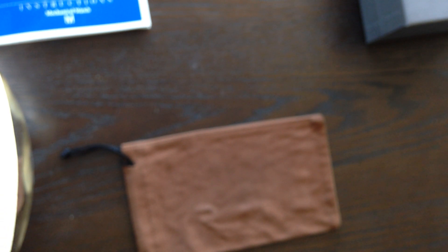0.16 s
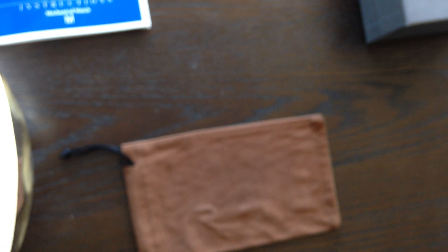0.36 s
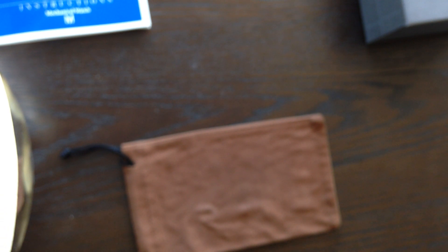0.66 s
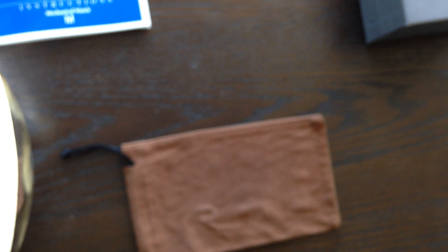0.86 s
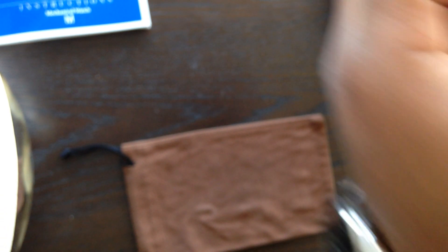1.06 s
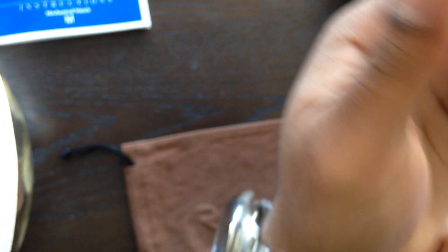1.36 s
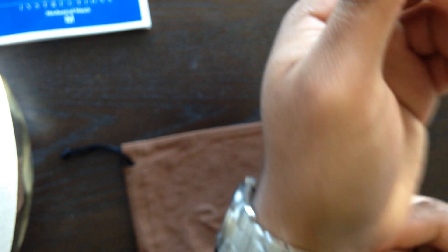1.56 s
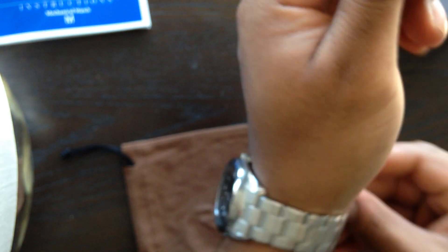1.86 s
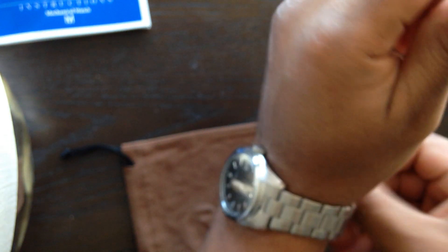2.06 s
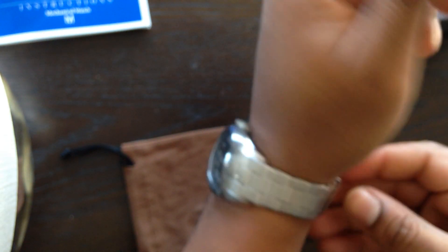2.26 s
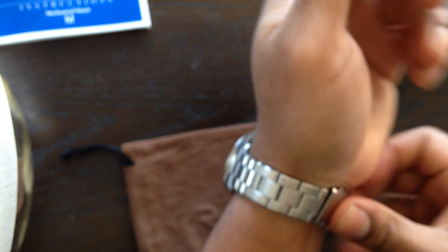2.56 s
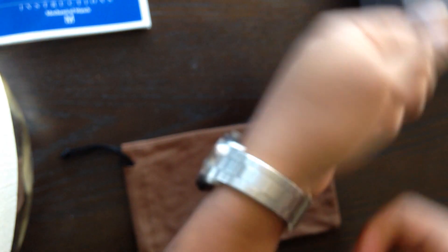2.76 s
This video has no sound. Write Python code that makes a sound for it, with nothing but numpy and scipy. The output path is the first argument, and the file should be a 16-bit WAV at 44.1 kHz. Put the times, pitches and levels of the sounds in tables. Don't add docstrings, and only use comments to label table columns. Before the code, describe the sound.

A metal watch bracelet clinks softly over a hand, then its clasp clicks and snaps shut.

```python
import sys
import numpy as np
from scipy import signal
from scipy.io import wavfile

SR = 44100
rng = np.random.default_rng(int(sys.argv[2]) if len(sys.argv) > 2 else 0)


def to_linear_factor(level_db):
    exponent = np.asarray(level_db, float) / 20
    return 10 ** exponent


def generate_wav(signal):
    frames = np.transpose(np.atleast_2d(signal))
    scaled = np.clip(frames, -1, 1) * 32767
    pcm = np.round(scaled).astype(np.int16)
    wavfile.write(sys.argv[1], SR, pcm)


N = 127890

# t/s, level/dB
SNAP = [
    (2.5963, -34),
    (2.5968, -19.5),
    (2.5972, -17),
    (2.5975, -17.5),
    (2.5981, -21),
    (2.5992, -27),
    (2.6007, -31),
]


def rms_one(x):
    return x / np.sqrt(np.mean(x ** 2) + 1e-20)


def in_time(rows):
    return np.interp(np.arange(N) / SR, *np.transpose(rows))


def at_hz(points, hz):
    freqs, values = np.array(points).T
    return np.interp(np.log(hz), np.log(freqs), values)


def drift(rate):
    step, settle = 40, 2000
    r = np.exp(-2 * np.pi * rate * step / SR)
    noise = rng.standard_normal(N // step + settle + 2)
    slow = signal.lfilter([1], [1, -2 * r, r * r], noise)[settle:]
    return np.interp(np.arange(N) / step, np.arange(len(slow)), rms_one(slow))


def ring(clicks, hz, t60):
    r = to_linear_factor(-60 / (t60 * SR))
    w = 2 * np.pi * hz / SR
    return signal.lfilter([0, np.sin(w)], [1, -2 * r * np.cos(w), r * r], clicks + 1e-18)


def whistle(hz, width, count):
    return rms_one(ring(rng.standard_normal(count), hz, 1.9 / width))


def highpass(x, order, hz):
    return signal.sosfilt(signal.butter(order, hz, "high", fs=SR, output="sos"), x)


def bands():
    edges = 20 * 2 ** np.arange(0, 9.9, 1 / 3)
    return [(np.sqrt(a * b), signal.butter(2, [a, b], "band", fs=SR, output="sos"))
            for a, b in zip(edges, edges[1:])]


def coloured(spectrum, patchy_db, source):
    low, high = spectrum[0][0] / 1.3, spectrum[-1][0] * 1.3
    total = np.zeros(N)
    for k, (hz, sos) in enumerate(bands()):
        if low < hz < high:
            gain = to_linear_factor(at_hz(spectrum, hz) + patchy_db * drift(26))
            total += gain * signal.sosfilt(sos, source[k % 2])
    return rms_one(total)


def add(out, s, burst):
    i = int(s * SR)
    out[i:i + len(burst)] += burst[:N - i]


def background():
    # f/Hz, level/dB per Hz
    floor_spectrum = [(12, -51), (20, -25), (101, 0.5), (222, -21), (388, -15.5), (738, -20.5),
                      (897, -27.5), (4940, -28.5), (16000, -41.5)]
    # f/Hz, width/Hz, level/dB rms, share of the load swing
    hum_lines = [(56.6, 14, -76.5, 0.71), (105.4, 29, -72, 0.037), (139, 53, -86, 0.12),
                 (217, 25, -83.5, 1), (295.6, 11, -84.5, 0.86)]
    # t/s, level/dB
    motor_load = [
        (0, 3.5),
        (1, -1),
        (1.5, 0),
        (1.7, 4.5),
        (2.05, 9),
        (2.15, -4),
        (2.9, -6),
    ]
    load_db = in_time(motor_load)
    out = to_linear_factor(-74.5) * coloured(floor_spectrum, 0.96, rng.standard_normal((2, N)))
    for hz, width, db, share in hum_lines:
        line = ring(rng.standard_normal(N + SR), hz, 3.5 / width)[SR:]
        out = out + to_linear_factor(db + share * load_db) * rms_one(line)
    return out


def room(x):
    # f/Hz, t60/s, level/dB
    decay = np.array([(1486, 0.47, -0.5), (3540, 0.17, 3.5), (5270, 0.32, 2.5), (7000, 0.13, -4.5),
                      (10000, 0.22, 3), (14000, 0.16, -0.5)])
    build_up_s = 0.006
    t = np.arange(SR // 2) / SR
    white = rng.standard_normal((2, len(t)))
    tail = np.zeros(len(t))
    for k, (hz, sos) in enumerate(bands()):
        if hz > 300:
            t60 = at_hz(decay[:, :2], hz)
            level_db = at_hz(decay[:, ::2], hz)
            tail += signal.sosfilt(sos, white[k % 2]) * to_linear_factor(level_db - 60 * t / t60)
    tail = tail * np.clip(t / build_up_s, 0, 1) ** 2
    return signal.fftconvolve(x, tail / np.sqrt(np.sum(tail ** 2)))[:N]


def reflections(struck):
    # t/s, level/dB
    surfaces = [
        (.0105, -16),
        (0.014, -25),
        (.0225, -32.5),
    ]
    out = np.zeros(N)
    for s, db in [(0.0017, -9.5)] + surfaces:
        out += to_linear_factor(db) * np.r_[np.zeros(int(s * SR)), struck[:-int(s * SR)]]
    return out


def sleeve():
    # t/s, level/dB
    effort = [(0, -69), (.15, -62.5), (.38, -62), (.5, -65), (.63, -62), (.82, -63.5), (.87, -69.5),
              (1.4, -69), (1.62, -71.5), (1.7, -64.5), (2.05, -70.5), (2.15, -71.5), (2.9, -71.5)]
    # f/Hz, level/dB per Hz
    cloth_spectrum = [(120, -14), (200, 2), (455, -5.5), (868, -10), (1150, -9.5), (2840, -13),
                      (3250, -15.5), (5000, -18), (6500, -53.5), (11000, -120)]
    # f/Hz, width/Hz, level/dB
    weave = [(1860, 130, -15), (2130, 100, -15), (2830, 90, -12), (4050, 120, -14)]
    lines = sum(to_linear_factor(db + 1.5 * drift(10)) * whistle(hz, width, N) for hz, width, db in weave)
    cloth = coloured(cloth_spectrum, 1.8, rng.standard_normal((2, N)))
    return to_linear_factor(in_time(effort) - 6) * (cloth + lines)


def rub():
    # t/s, level/dB
    speed = [(0, -73.5), (.08, -75.5), (.22, -69), (.4, -77), (.6, -78), (.8, -72), (.88, -79.5),
             (.96, -68.5), (1.06, -64), (1.15, -71.5), (1.22, -73.5), (1.3, -75), (1.39, -69.5),
             (1.5, -79.5), (1.7, -76.5), (2, -82.5), (2.18, -76), (2.9, -82.5)]
    # f/Hz, level/dB per Hz
    friction_spectrum = [(1470, -45.5), (2500, -6.5), (3950, -22), (5920, 0), (10100, -1.5), (13400, -6),
                         (15500, -3)]
    grains_per_s, grain_db, spread_db = 300, 10.5, 4
    db = in_time(speed)
    born = rng.random((2, N)) < grains_per_s * to_linear_factor(db - db.max()) / SR
    height = to_linear_factor(spread_db * np.minimum(rng.exponential(1, (2, N)), 3))
    grains = born * height * rng.choice([-1, 1], (2, N))
    source = rng.standard_normal((2, N)) + to_linear_factor(grain_db) * grains
    return to_linear_factor(db) * to_linear_factor(2 * drift(22)) * coloured(friction_spectrum, 2.3, source)


def knocks():
    # t/s, level/dB peak, f/Hz, overtones/dB
    thuds = [(.33, -57, 2350, -6), (.539, -47, 1530, -24), (.572, -39, 1500, -5), (.5721, -43, 2650, -8),
             (1.87, -56, 1400, 0), (2.03, -49, 1068, -22), (2.047, -58, 1900, -10), (2.154, -55, 945, -17),
             (2.209, -54, 1915, -7), (2.251, -58, 1300, 0), (2.2545, -49, 2300, -3), (2.255, -54, 1400, -6),
             (2.5866, -54, 2600, 0), (2.597, -46, 420, -3.5), (2.598, -37, 1570, -14),
             (2.7133, -58, 2900, -8)]
    t60 = 0.0045
    out, touch = np.zeros(N), np.r_[1, np.zeros(1500)]
    for s, db, hz, over_db in thuds:
        overtones = sum(ring(touch, m * hz, t60) for m in (2.0, 2.42, 3.8, 3.7))
        body = ring(touch, hz, t60) + to_linear_factor(over_db) * overtones
        band = signal.butter(2, [0.53 * hz, min(4.4 * hz, 12000)], "band", fs=SR, output="sos")
        add(out, s, to_linear_factor(db) * signal.sosfilt(band, body))
    return out


def ticks(rows):
    ring_s, crack_s = 0.0019, 0.0007
    out, touch = np.zeros(N), np.r_[1, np.zeros(800)]
    t = np.arange(len(touch)) / (crack_s * SR)
    crack = signal.butter(2, [12000 / 3.45, 12000 * 1.83], "band", fs=SR, output="sos")
    for s, db, hz, bright_db in rows:
        body = np.zeros(len(touch))
        for mode_hz, gain in [(hz, 1), (hz / 1.2, to_linear_factor(-36))]:
            mode = touch
            for _ in range(3):
                mode = ring(mode, mode_hz, ring_s)
            body += gain * rms_one(mode)
        noise = signal.sosfilt(crack, rng.standard_normal(len(touch)) * np.sqrt(t) * np.exp(-t))
        click = body / np.abs(body).max() + to_linear_factor(bright_db) * noise / np.abs(noise).max()
        add(out, s, to_linear_factor(db) * click)
    return highpass(out, 4, 4250)


def chatter(rows):
    gap_s, fall_db = 0.0022, -14
    followers = []
    for s, db, hz, bright_db in rows:
        for k, (gap, drop, tune) in enumerate(rng.random((3, 3))):
            later = s + gap_s * (k + 0.24 + gap)
            weaker = db + fall_db * (0.48 + drop)
            detuned = min(hz * (0.99 + 0.22 * tune), 14000)
            followers.append((later, weaker, detuned, bright_db))
    return followers


def links():
    # t/s, level/dB peak, f/Hz, bright share/dB
    contacts = [(0.011, -67.5, 4900, 21), (0.0909, -54, 7340, 6.5), (0.1207, -53.5, 7300, 10.5),
                (0.2295, -50, 7540, 6.5), (0.24, -48.5, 8300, 3), (0.2444, -49, 6740, 5.5),
                (0.3294, -36, 6440, 3), (0.378, -53.5, 6700, -5), (0.4732, -72, 7500, 5),
                (0.4891, -60, 6480, -11), (0.5396, -41.5, 5840, 2), (0.6432, -45, 12600, 3),
                (0.6646, -48.5, 10000, 6), (0.7848, -59, 12000, 6), (0.7836, -61, 8100, 12),
                (0.806, -55, 11300, 12), (0.8144, -55, 3960, 2), (0.8868, -46.5, 12230, -1),
                (0.9218, -55.5, 11400, 8.5), (0.9, -64, 6260, 0), (0.949, -54, 12900, -1),
                (0.975, -67, 9200, 16), (1.018, -63, 10500, 15), (1.035, -62, 7440, 6),
                (1.071, -62, 11000, 0), (0.9963, -53, 5850, 9.5), (1.0553, -59, 8260, 13),
                (1.0878, -53, 8800, -2), (1.1041, -56.5, 11700, 11), (1.129, -61, 4540, 10.5),
                (1.1438, -55, 12300, -8), (1.2119, -49.5, 9650, 4.5), (1.2555, -60, 6800, 11.5)]
    return ticks(contacts + chatter(contacts))


def clasp():
    # t/s, level/dB peak, f/Hz, bright share/dB
    handling = [(1.5494, -51, 12200, 6), (1.6192, -60, 5640, 4), (1.6337, -59.5, 6900, 3),
                (1.6676, -56.5, 13900, -1), (1.6846, -62, 6030, 8.5), (1.724, -60, 7360, 7),
                (1.738, -65.5, 7950, 8), (1.704, -60.5, 6730, 12), (1.7814, -41, 6330, -9),
                (1.9308, -56, 5440, -10), (1.9308, -60, 6850, -7), (1.9605, -57, 5530, -5),
                (1.9635, -60, 6200, -3), (1.9719, -40.5, 5640, -7), (1.9719, -42, 6800, 1),
                (2.0133, -55.5, 8200, -2.5), (2.0984, -61.5, 8900, 1), (2.144, -63.5, 7000, 7),
                (2.1126, -59, 6920, 8), (2.19, -59.5, 6000, 3), (2.1985, -61, 8970, 10),
                (2.209, -61.5, 10900, 3), (2.223, -56.5, 7000, -4), (2.244, -61.5, 6800, -10),
                (2.248, -43, 6300, -1.5), (2.4064, -49.5, 6100, 0), (2.7012, -65.5, 7600, 8),
                (2.7133, -41.5, 8500, -3), (2.7133, -45, 6260, -13.5)]
    # t/s, level/dB peak, f/Hz, bright share/dB
    catches = [(1.8688, -27, 7400, -7.5), (1.8688, -29.5, 5550, -31), (1.8706, -33, 6600, -2),
               (1.8706, -35, 5390, -34), (1.874, -57, 5350, -18), (1.8818, -42, 5350, -20),
               (1.8838, -48, 5350, -18), (2.2508, -29.5, 6500, 2.5), (2.2535, -40.5, 6070, -5),
               (2.2547, -16.5, 6980, -6), (2.2552, -38, 4320, -29), (2.2566, -30, 7600, 0),
               (2.258, -44.5, 7600, 9), (2.5733, -58.5, 7000, 8), (2.5758, -41.5, 7000, 4),
               (2.5845, -51.5, 7000, 6), (2.5866, -37.5, 6500, 6.5), (2.5885, -54, 6500, -11)]
    return ticks(handling) + ticks(catches)


def shiver():
    # f/Hz, width/Hz, level/dB, t60/s
    clusters = [(3600, 500, -8, 0.13), (4120, 300, -2.5, 0.24), (4860, 180, -1.5, 0.31),
                (5040, 260, -4, 0.36), (5850, 680, -8, 0.27), (6500, 450, -6, 0.29), (7480, 220, -4.5, .28),
                (8500, 700, -10, .2), (9400, 550, -10.5, .18), (10280, 660, -5.5, 0.24),
                (11650, 300, -1.5, .22), (12400, 380, -6.5, .2), (13900, 900, -12, 0.12)]
    rise_s = 0.0084
    out, t = np.zeros(N), np.arange(SR // 2) / SR
    wash = sum(to_linear_factor(db - 60 * t / t60) * whistle(hz, width, len(t)) for hz, width, db, t60 in clusters)
    wash = highpass(wash, 6, 3350)
    add(out, SNAP[1][0], to_linear_factor(-43.5) * np.clip(t / rise_s, 0, 1) ** 2 * wash)
    return out


def snap():
    # f/Hz, width/Hz, level/dB
    clasp_modes = [(3320, 230, -27), (3625, 300, -11), (4220, 450, -7.5), (4900, 285, -2), (6425, 150, -5),
                   (7630, 550, 0.5), (8220, 510, -5.5), (8950, 340, -6.5), (10020, 690, 0.5),
                   (11700, 160, -6), (12740, 380, -9), (13800, 3200, 6.5)]
    out, (s, db) = np.zeros(N), np.transpose(SNAP)
    for hz, width, level_db in clasp_modes:
        strength = to_linear_factor(db + level_db + rng.normal(0, 1.3, len(s)))
        clicks = np.zeros(N)
        clicks[(s * SR).astype(int)] = strength * rng.choice([-1, 1], len(s))
        out += ring(clicks, hz, 2.57 / width)
    return highpass(out, 6, 3300)


def scene():
    watch = links() + clasp() + knocks()
    struck = watch + snap()
    near = struck + reflections(struck)
    far = to_linear_factor(-17.5) * room(watch)
    return (near + far + shiver() + rub() + sleeve() + background())[None]


def band_limit(x):
    return signal.sosfilt(signal.butter(12, 16500, fs=SR, output="sos"), x)


def record(dry):
    low_cut = highpass(dry, 2, 48)
    top_cut = signal.sosfilt(signal.cheby2(14, 32, 15550, fs=SR, output="sos"), low_cut)
    return band_limit(top_cut)


dry = scene()
out = record(dry)
generate_wav(out)
```